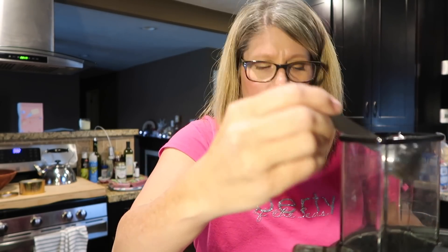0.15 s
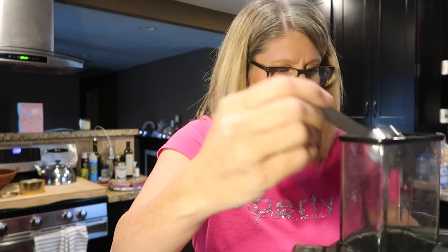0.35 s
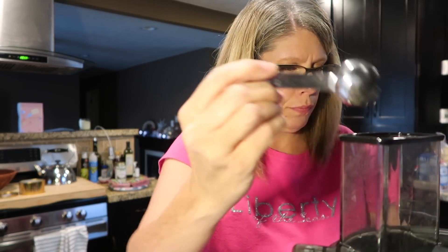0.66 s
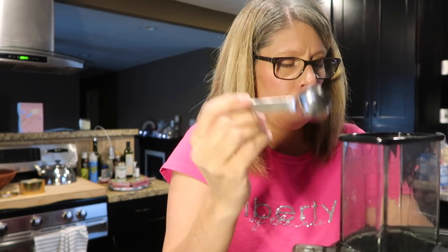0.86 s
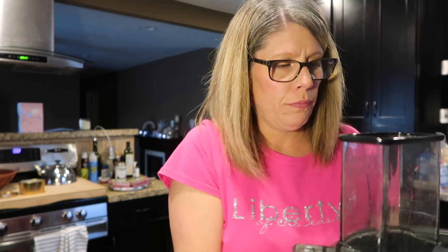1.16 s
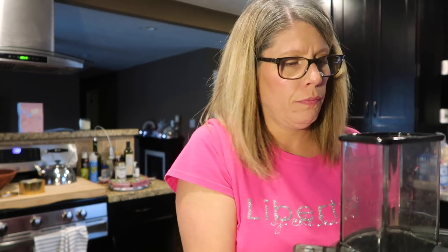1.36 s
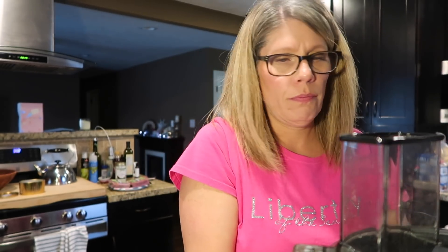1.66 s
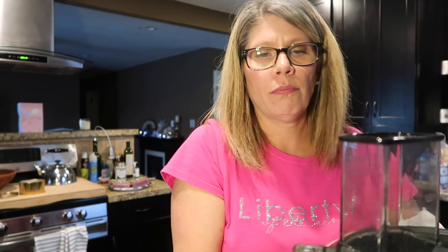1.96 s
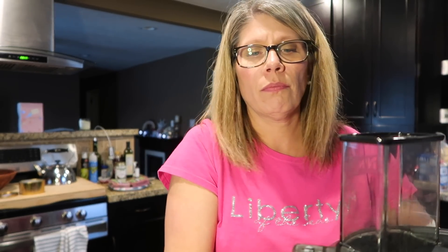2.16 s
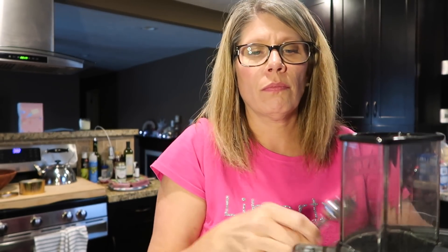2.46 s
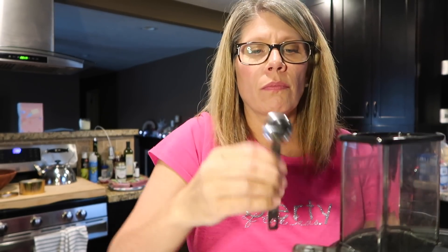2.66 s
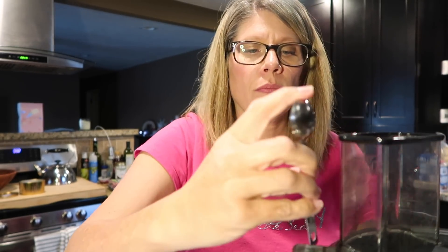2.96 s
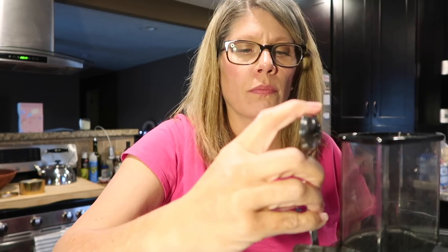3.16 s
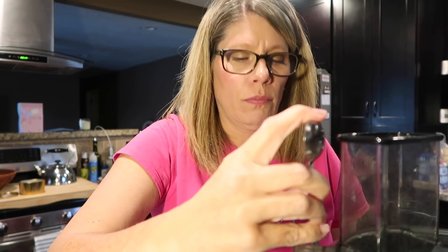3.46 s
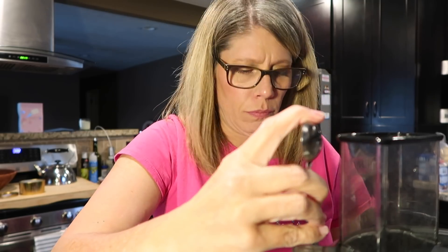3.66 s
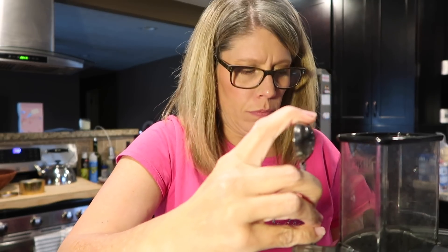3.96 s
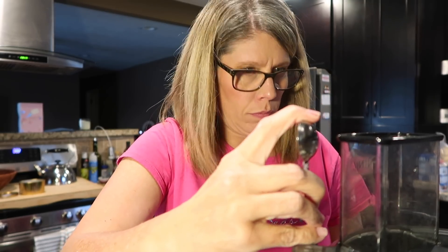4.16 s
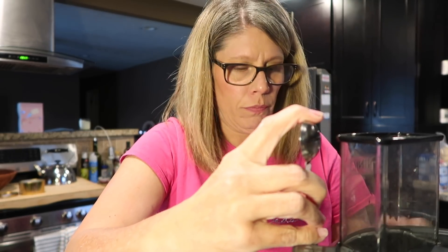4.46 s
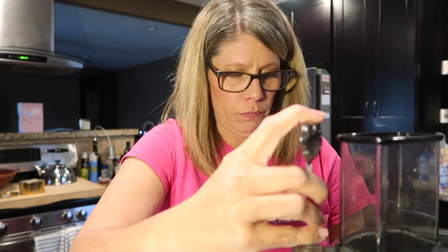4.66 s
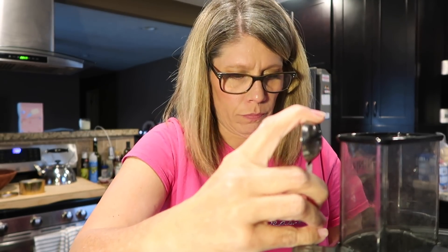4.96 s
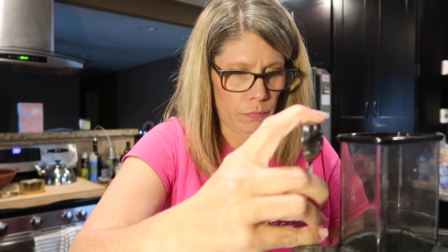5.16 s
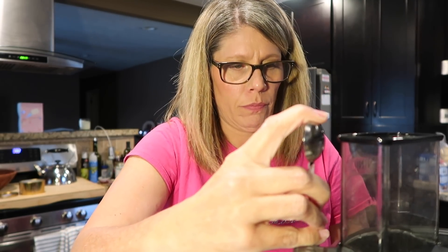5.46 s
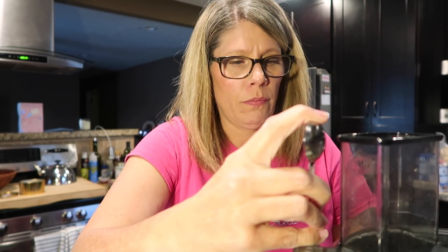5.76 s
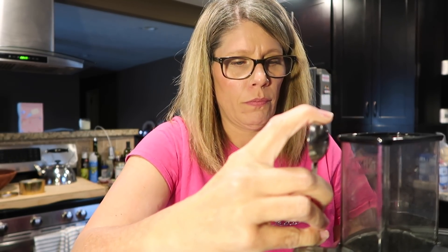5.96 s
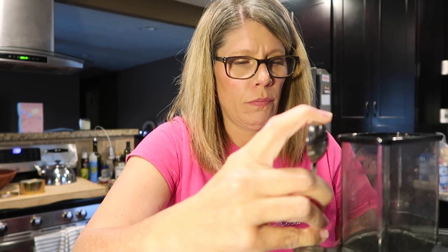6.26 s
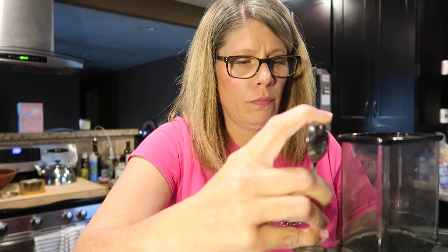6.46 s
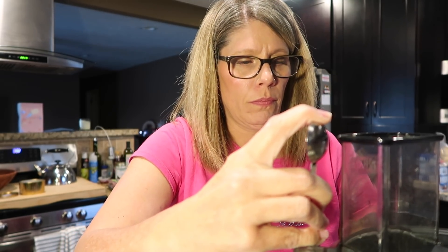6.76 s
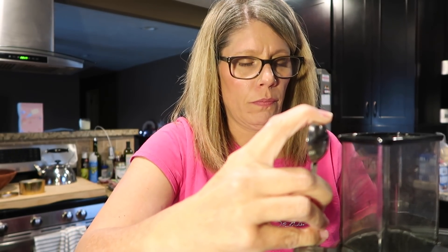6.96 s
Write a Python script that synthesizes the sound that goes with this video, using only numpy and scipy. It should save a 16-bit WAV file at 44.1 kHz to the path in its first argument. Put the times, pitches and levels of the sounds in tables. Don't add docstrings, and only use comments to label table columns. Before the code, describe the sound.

A metal spoon raps a plastic jar rim four times, then quiet hum and rustling, a small slap, a switch clack, and a whirring kitchen motor.

```python
import sys
import numpy as np
from scipy import signal
from scipy.fft import rfft, irfft, next_fast_len
from scipy.io import wavfile
from scipy.ndimage import uniform_filter1d

SR = 44100
rng = np.random.default_rng(int(sys.argv[2]) if len(sys.argv) > 2 else 0)


def invert_db(level):
    return 10 ** (np.asarray(level, dtype=float) / 20)


def log_audio(samples):
    frames = np.atleast_2d(samples).T
    limited = np.clip(frames, -1, 1)
    pcm = np.round(limited * 32767).astype(np.int16)
    wavfile.write(sys.argv[1], SR, pcm)


N = 313992

IDLE_ON_S, FULL_ON_S = 5.448, 5.996
RESET_S = 4.1
MOTOR_SIZE = 2 * SR

# mode in Hz, level in dB, t60 in s.
STEEL = [(1660, 5, 0.014), (2400, 8.5, 0.0052), (2750, -3, 0.012), (3200, 4.5, 0.005), (4660, -6.5, 0.011),
         (5180, -11, 0.033), (7030, -6, .006)]
# frequency in Hz, phase in radians.
PORT_PHASE = [(200, 0), (1800, -.25), (3200, -.5), (4300, -1.15), (7500, -2.1), (10000, -2.6),
              (15000, -2.5)]


def spoon_raps():
    # start in seconds, peak in dB, brightness in dB.
    raps = [
        (.0392, -6.5, -1),
        (.0478, -15.5, 12),
        (.2135, -1.5, -7.5),
        (.2195, -10.5, 6.5),
        (.3902, -12, -1),
        (.3968, -4, 0.5),
        (.5682, -9, -6),
        (.5853, -11, 8),
    ]
    # mode in Hz, level in dB, t60 in s.
    jar_modes = [(130, -18, .04), (200, -15, .04), (390, -5, .035), (560, -6, .035), (800, -16, .015),
                 (1700, -2, .012), (1980, 2.5, .012), (1030, -12, .1), (1150, 1, .013), (1290, -10, .09),
                 (1390, -1, .012)]
    spoon_modes = [(2250, 1, .009), (2550, 0, .008), (2830, 4, .011), (3120, 0, .008), (3550, -4, .007),
                   (4300, -12, .006), (5150, -12, .007), (6300, -22, .005), (7700, -16, .006),
                   (10500, -22, .004), (13000, -12, .004)]
    return struck(raps, jar_modes, spoon_modes, contact_s=0.018, grit_db=-3.16, top_hz=9920, crack_db=-23)


def jar_rocks():
    # start in seconds, peak in dB, brightness in dB.
    rocks = [
        (.1718, -15.5, -3),
        (.179, -19, -14),
        (.187, -24.5, -13.5),
        (.196, -20.5, -17.5),
        (.205, -23, -16),
    ]
    # mode in Hz, level in dB, t60 in s.
    counter_modes = [(130, -10, 0.017), (296, 2, 0.01), (468.3, -4, 0.033), (745.5, 9, 0.01),
                     (1050, 0.5, 0.013)]
    rim_modes = [(1500, -5, .03), (2000, -6, .03), (3260, -4, .1), (6100, -22, .04)]
    return struck(rocks, counter_modes, rim_modes, contact_s=0.019, grit_db=3.4, top_hz=5066, crack_db=-37)


def earlier_rap(room):
    dull = signal.butter(2, [90, 1500], "band", fs=SR, output="sos")
    tail = signal.sosfilt(dull, room[:, SR // 8:])
    return invert_db(20) * np.pad(tail, ((0, 0), (0, N - tail.shape[1])))


def motor():
    # frequency in Hz, level in dB per Hz.
    idle_tone = [(35, -62), (60, -29), (129, -9.5), (305, -13.5), (909, -7), (1380, -12), (1630, -7.5),
                 (3040, -13), (4020, -20.5), (4520, -17.5), (8460, -41), (10700, -48), (15500, -58)]
    run_tone = [(35, -60), (70, -36), (156, -4), (394, -8), (900, -1.5), (1380, -8), (2300, -0.5),
                (3300, -8), (4410, -12), (6500, -18.5), (8600, -30), (9600, -25.5), (12000, -27.5),
                (15500, -44)]
    # centre in Hz, width in Hz, level in dB.
    idle_peaks = [(140.4, 28, -11.5), (1593, 32, -9), (2285, 43, -14), (3043, 27, -19)]
    run_peaks = [(915, 24, -32.5), (1140, 76, -11.5), (1580, 14, -14.5), (1900, 23, -16), (2314, 72, -10),
                 (2950, 120, -13.5), (3324, 120, -13), (4500, 40, -29)]
    spectrum, hz = coloured(idle_tone, size=MOTOR_SIZE)
    gears = patchy(spectrum[1], hz, patchy_db=0.7, rate=27) + resonant(idle_peaks, size=MOTOR_SIZE)
    idle_db = -45 - 2 * switched_on(FULL_ON_S)
    idle = switched_on(IDLE_ON_S) * invert_db(idle_db) * gears
    bearing = squeal()
    spectrum, hz = coloured(run_tone, size=MOTOR_SIZE)
    housing = patchy(spectrum[1], hz, patchy_db=2.14, rate=14) + resonant(run_peaks, size=MOTOR_SIZE)
    housing = housing * surged(settled_db=-38, surge_db=-5.5, surge_s=0.057)
    drone = resonant([(144, 69, -3.5), (475, 390, -3.0)], size=MOTOR_SIZE)
    drone = drone * surged(settled_db=-60.5, surge_db=23.2, surge_s=0.27)
    return idle + bearing + housing + drone + whine()


def whine():
    # time in seconds, commutator bar-passing rate in Hz.
    rotor_speed = [
        (6.0, 1950),
        (6.14, 3330),
        (6.24, 3760),
        (6.4, 4200),
        (6.5, 4300),
        (6.65, 4030),
        (6.885, 3640),
        (7.0, 3970),
        (7.12, 4230),
    ]
    hz = uniform_filter1d(in_time(rotor_speed), size=2000) * (1 + .003 * drift(70))
    turns = 2 * np.pi * np.cumsum(hz) / SR
    tone = surged(settled_db=-49.5, surge_db=10, surge_s=.15) * invert_db(1.3 * drift(30)) * np.sin(turns)
    low_noise = signal.butter(2, 450, fs=SR, output="sos")
    air = rms_one(signal.sosfilt(low_noise, rng.standard_normal(N)))
    rush = surged(settled_db=-48, surge_db=17, surge_s=.16) * air * np.sin(.8 * turns)
    return switched_on(FULL_ON_S, rise_s=.035) * (tone + rush)


def squeal():
    start, end, pitch_hz = 5.51, 6.21, 4450
    start_db, swell_db_per_s, rest_db = -58.5, 11, -64
    peak_db = start_db + swell_db_per_s * (end - start)
    level_db = in_time([(start, start_db), (end, peak_db), (end + 0.037, rest_db)])
    scrape = resonant([(pitch_hz, 35, -9)], size=MOTOR_SIZE)
    song = np.sin(2 * np.pi * pitch_hz * np.arange(N) / SR + 1.2 * drift(12))
    return switched_on(start) * invert_db(level_db) * (scrape + song)


def switch_clack():
    # start in seconds, peak in dB, brightness in dB.
    clacks = [(5.347, -41.5, -12), (5.352, -39.5, -44), (5.405, -50, 5), (5.41, -57, -4),
              (5.431, -46.5, -1), (5.444, -31, -7), (5.448, -22, -6), (5.454, -43, 4), (5.461, -29, -4),
              (5.466, -47, -18), (5.48, -24, -31), (5.495, -26.5, -35), (5.501, -48, -28)]
    # mode in Hz, level in dB, t60 in s.
    base_modes = [(143, -16, 0.015), (328, -4, 0.011), (608, 1, 0.015), (804, -8.5, 0.028),
                  (1098, -1, 0.013)]
    lever_modes = [(1370, 4.5, 0.0067), (1830, 4, 0.01), (2600, 8.5, 0.0037), (3440, 0.5, 0.012),
                   (5130, -23, 0.0067), (8700, 1, 0.003), (12500, -26, .004)]
    return struck(clacks, base_modes, lever_modes, contact_s=0.066, grit_db=2.5, top_hz=5900, crack_db=-18)


def palm_slaps():
    # start in seconds, peak in dB, brightness in dB.
    slaps = [
        (3.238, -33.5, 3),
        (3.2396, -32, 4),
        (3.2412, -22.5, 0),
        (3.247, -25.5, -32),
        (3.251, -27.5, -0.5),
    ]
    # mode in Hz, level in dB, t60 in s.
    palm_modes = [(141, 6, 0.076), (242, 4, 0.018), (530, -9, 0.0053), (734, 0.5, 0.016), (1210, -4, 0.012)]
    return struck(slaps, palm_modes, STEEL, contact_s=0.018, grit_db=2.0, top_hz=7160, crack_db=-20)


def spoon_ticks():
    # start in seconds, peak in dB, brightness in dB.
    ticks = [
        (3.3435, -42, 9.5),
        (3.4765, -37.5, -18),
        (3.481, -32.5, -2.5),
    ]
    # mode in Hz, level in dB, t60 in s.
    bowl_modes = [(773, 11.5, 0.026), (1080, -11, 0.019)]
    return struck(ticks, bowl_modes, STEEL[:3], contact_s=0.023, grit_db=1.5, top_hz=2500, crack_db=-40)


def rustle():
    # time of the peak in seconds, peak in dB, length in seconds.
    brushes = [(1.001, -59, 0.15), (1.14, -60.5, 0.06), (1.37, -50, 0.046), (1.523, -55.5, .3),
               (1.713, -49, 0.15), (1.89, -55, 0.38), (2.257, -52, 0.23), (2.39, -42.5, 0.058),
               (2.614, -51.5, 0.12), (2.716, -40.5, .08), (2.8, -48.5, 0.41), (2.896, -47, 0.023),
               (3.953, -63, .1), (4.09, -52.5, 0.014)]
    # frequency in Hz, level in dB per Hz.
    cloth_tone = [(350, -26), (600, -6.5), (1380, -7), (2210, -4), (2870, -8.5), (4250, -12.5), (4550, -12),
                  (11600, -29), (15500, -38)]
    rise_share, depth_db = 0.81, 8.5
    t, power = np.arange(0, N, 32) / SR, 0
    for peak_s, peak_db, length in brushes:
        away = np.maximum((peak_s - t) / rise_share, (t - peak_s) / (1 - rise_share)) / length
        power = power + invert_db(2 * (peak_db - depth_db * away))
    swell = in_time(np.transpose([t, np.sqrt(power)]))
    return swell * (1 - switched_on(RESET_S)) * patchy(*coloured(cloth_tone), patchy_db=1.5, rate=28)


def hum():
    # frequency in Hz, level in dB per Hz.
    hum_tone = [(15, -33), (25, -16), (55, -4.5), (86, -12), (101, -11), (122, -3.5), (148, -11),
                (239, -13.5), (297, -8.5), (322, -11), (537, -19.5), (1530, -26.5), (8120, -43),
                (12800, -52.5), (15500, -56)]
    # centre in Hz, width in Hz, level in dB.
    room_modes = [(49.86, 4.8, -10), (119, 4.9, -10), (300, 40, -19), (384, 120, -7.5)]
    duct_hiss = [(4150, 110, -32)]
    air = patchy(*coloured(hum_tone), patchy_db=-1.0, rate=7.3) + resonant(room_modes)
    whistle = invert_db(-40 + 2.4 * drift(6.7)) * np.sin(2 * np.pi * 13006 * np.arange(N) / SR)
    duct = resonant(duct_hiss) * [[1], [-1]]
    return invert_db(gain_db()) * (rms_one(air) + whistle * [[.4], [1]] + duct)


def gain_db():
    pressed_db, ceiling_db, reset_db, ducked_db = -56.5, -41, -63.5, -70.5
    creep_from_s, creep_db_per_s, sag_db_per_s = 0.85, 9, 1.5
    top_s = creep_from_s + (ceiling_db - pressed_db) / creep_db_per_s
    sagged_db = ceiling_db - sag_db_per_s * (RESET_S - top_s)
    return in_time([(creep_from_s, pressed_db), (top_s, ceiling_db), (RESET_S, sagged_db),
                    (RESET_S + .008, reset_db), (IDLE_ON_S, reset_db), (FULL_ON_S, ducked_db)])


def kitchen():
    # frequency in Hz, level in dB.
    tail_tone = [(60, -9), (300, 0), (1300, 0), (2800, -5.5), (3600, -2), (5000, 3), (8000, 2), (15000, -7)]
    # frequency in Hz, t60 in s.
    tail_decay = [(60, .3), (250, .25), (1000, .48), (2000, .42), (4000, .44), (8000, .3), (16000, .25)]
    size = SR // 2
    spectrum, hz = coloured(tail_tone, size=size)
    t, out = np.arange(size) / SR, 0
    for octave in np.arange(5, 15):
        share = np.clip(1 - np.abs(np.log2(hz) - octave), 0, 1)
        out = out + irfft(spectrum * share, size) * invert_db(-60 * t / at_hz(tail_decay, 2. ** octave))
    out = out * np.clip((t - .003) / 0.0028, 0, 1)
    return rms_one(out) / np.sqrt(size)


def heard(x, wet_db, room, shaded=True):
    # frequency in Hz, left against right in dB.
    left_shadow = [(200, -1.5), (700, -1.5), (1400, 0), (2800, -0.5), (5000, -1.5), (9000, 0)]
    size = next_fast_len(N + len(room[0]))
    hz = np.maximum(np.fft.rfftfreq(size, 1 / SR), 1)
    shade_db = at_hz(left_shadow, hz) if shaded else 0
    left = invert_db(shade_db) * np.exp(1j * at_hz(PORT_PHASE, hz))
    direct = np.array([left, np.ones_like(left)])
    return irfft(rfft(x, size) * (direct + invert_db(wet_db) * rfft(room, size)), size)[:, :N]


def struck(events, body, bright, contact_s, grit_db, top_hz, crack_db):
    rows = np.array(events)
    at, peak_db, bright_db = (rows[:, 0] * SR).astype(int), rows[:, 1], rows[:, 2]
    luck_db = 1.5 * rng.standard_normal((len(rows), len(body + bright)))
    first, size = at[0], at[-1] - at[0] + SR // 2
    noise, out = rng.standard_normal(size), np.zeros(size)
    fade = invert_db(-60 / (contact_s * SR))
    grit = invert_db(grit_db) * noise * np.sqrt(1 - fade ** 2)
    for k, (hz, level_db, t60) in enumerate(body + bright):
        clicks = np.full(size, 1e-18)
        clicks[at - first] = invert_db(peak_db + level_db + luck_db[:, k] + bright_db * (k >= len(body)))
        push = (-1) ** k * clicks + grit * signal.lfilter([1], [1, -fade], clicks)
        r, w = invert_db(-60 / (t60 * SR)), 2 * np.pi * hz / SR
        out += signal.lfilter([0, np.sin(w)], [1, -2 * r * np.cos(w), r * r], push)
    out = invert_db(-8.0) * signal.sosfilt(signal.butter(2, [125, top_hz], "band", fs=SR, output="sos"), out)
    clicks[at - first] = invert_db(peak_db + bright_db + crack_db)
    snap = rng.standard_normal(size) * signal.lfilter([1], [1, -invert_db(-60 / (.006 * SR))], clicks)
    out += signal.sosfilt(signal.butter(2, 2500, "high", fs=SR, output="sos"), snap)
    return np.pad(out, (first, N - first - size))


def coloured(spectrum, size=next_fast_len(N)):
    # frequency in Hz, left-right likeness from 0 to 1.
    likeness = [(60, 1), (300, 0.91), (1000, .82), (3000, 0.67), (6000, 0.75), (15000, 0.21)]
    hz = np.maximum(np.fft.rfftfreq(size, 1 / SR), 1)
    mid, side = rfft(rng.standard_normal((2, size))) * invert_db(at_hz(spectrum, hz))
    alike = np.clip(at_hz(likeness, hz), -1, 1)
    left, right = np.sqrt(1 + alike) * mid + np.sqrt(1 - alike) * side * [[1], [-1]]
    return np.array([left * np.exp(1j * at_hz(PORT_PHASE, hz)), right]), hz


def patchy(spectrum, hz, patchy_db, rate):
    size, out = 2 * (len(hz) - 1), 0
    for octave in np.arange(4, 15):
        share = np.clip(1 - np.abs(np.log2(hz) - octave), 0, 1)
        out = out + irfft(spectrum * share, size) * invert_db(patchy_db * drift(rate, size=size))
    out = rms_one(out)[..., :N]
    return out if size >= N else np.pad(out, (N - size, 0))


def resonant(peaks, size=N):
    out = np.zeros(size)
    for hz, width, level_db in peaks:
        r = np.exp(-np.pi * width / SR)
        poles = [1, -2 * r * np.cos(2 * np.pi * hz / SR), r * r]
        once = signal.lfilter([1, 0, -1], poles, rng.standard_normal(size))
        out += invert_db(level_db) * rms_one(signal.lfilter([1], poles, once))
    return np.pad(out, (N - size, 0))


def drift(rate, size=N):
    r = np.exp(-80 * np.pi * rate / SR)
    slow = signal.lfilter([1], [1, -2 * r, r * r], rng.standard_normal(size // 40 + 2002))[2000:]
    return np.interp(np.arange(size) / 40, np.arange(len(slow)), rms_one(slow))


def switched_on(on_s, rise_s=.008):
    return np.clip((np.arange(N) / SR - on_s) / rise_s, 0, 1)


def surged(settled_db, surge_db, surge_s):
    since = np.maximum(np.arange(N) / SR - FULL_ON_S, 0)
    return switched_on(FULL_ON_S) * invert_db(settled_db + surge_db * np.exp(-since / surge_s))


def rms_one(x):
    return x / np.sqrt(np.mean(x ** 2) + 1e-20)


def in_time(rows):
    return np.interp(np.arange(N) / SR, *np.transpose(rows))


def at_hz(points, hz):
    return np.interp(np.log(hz), np.log(np.array(points)[:, 0]), np.array(points)[:, 1])


def scene():
    # left gain, right gain in dB.
    room_pan_db = np.array([[-.15], [.15]])
    room = kitchen()
    counter = heard(spoon_raps() + jar_rocks() + switch_clack(), wet_db=-12.0, room=room)
    jar = counter + earlier_rap(room)
    machine = heard(motor(), wet_db=-18.5, room=room)
    hand = heard(palm_slaps() + spoon_ticks(), wet_db=-8.0, room=room, shaded=False)
    return jar + machine + (hand + hum() + rustle()) * invert_db(room_pan_db)


def band_limit(x):
    return signal.sosfilt(signal.butter(12, 15630, fs=SR, output="sos"), x)


def record(dry):
    x = signal.sosfilt(signal.butter(4, 36, "high", fs=SR, output="sos"), dry)
    x = signal.sosfilt(signal.cheby2(18, 40, 15600, fs=SR, output="sos"), x)
    return band_limit(x)


dry = scene()
out = record(dry)
log_audio(out)
```